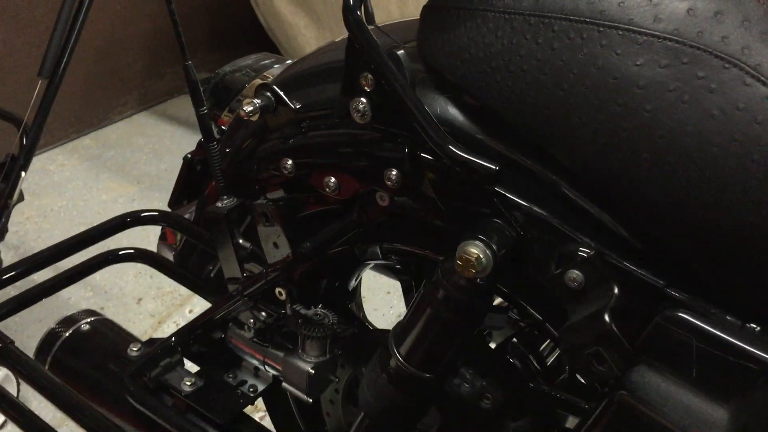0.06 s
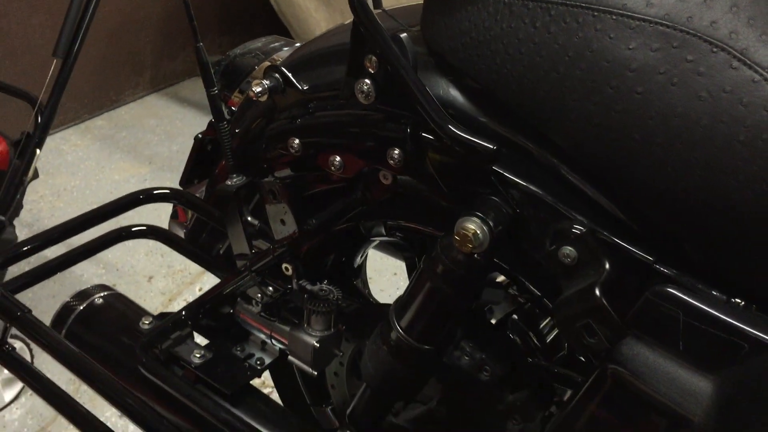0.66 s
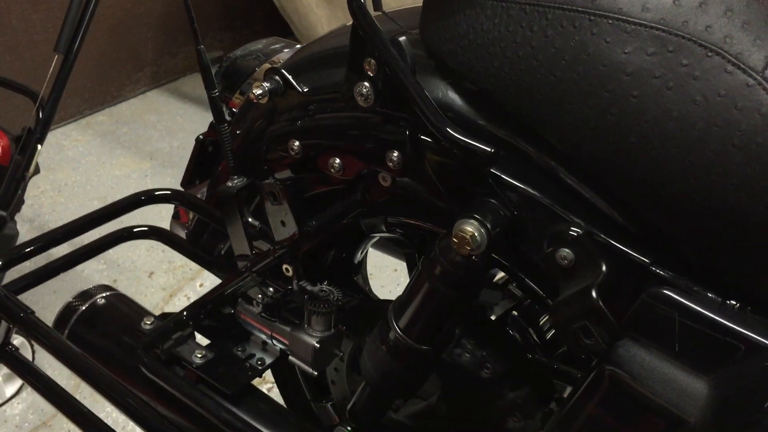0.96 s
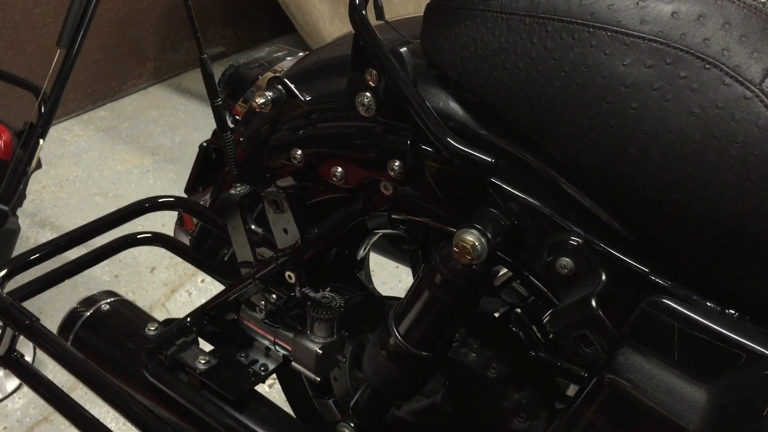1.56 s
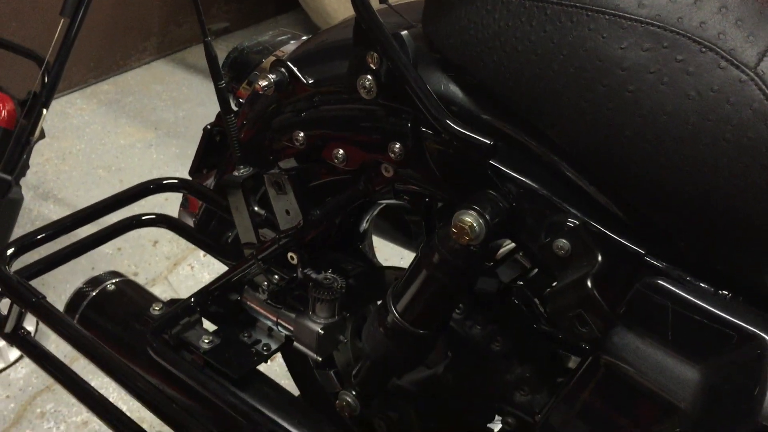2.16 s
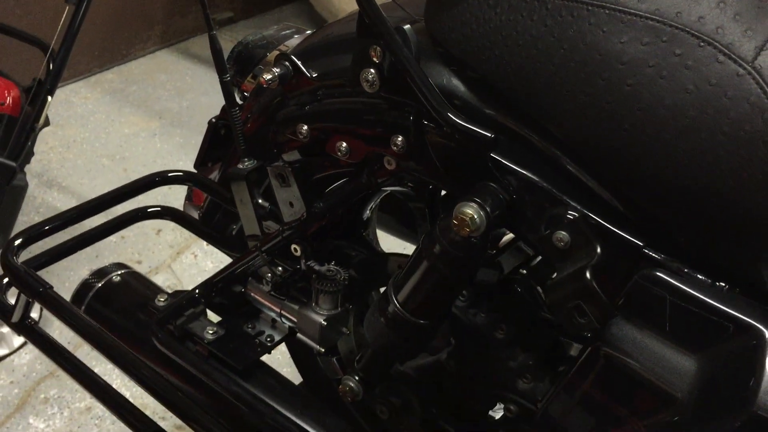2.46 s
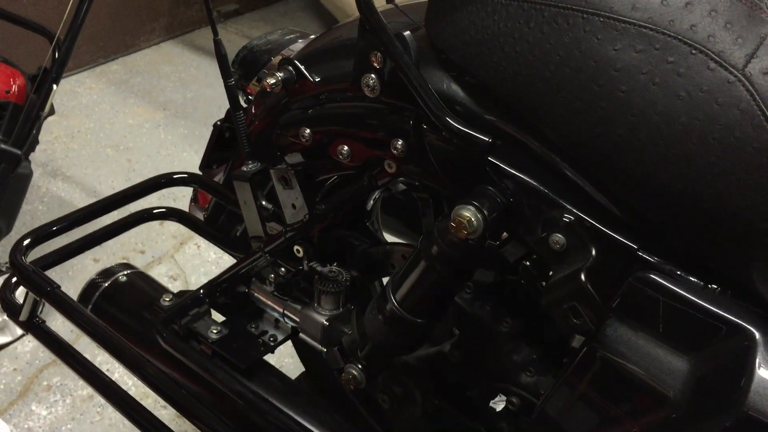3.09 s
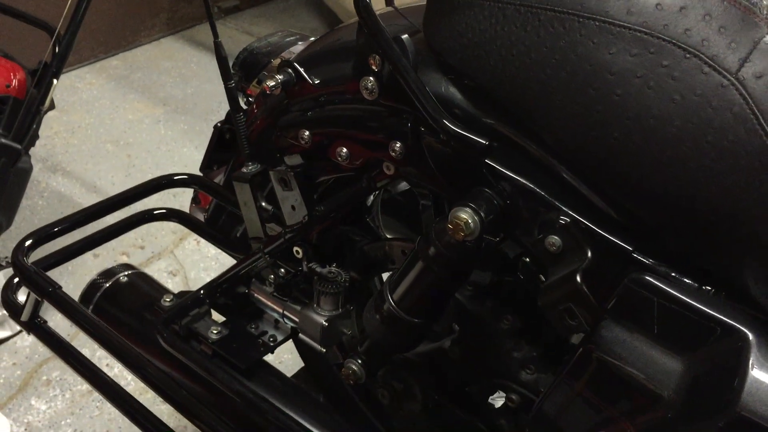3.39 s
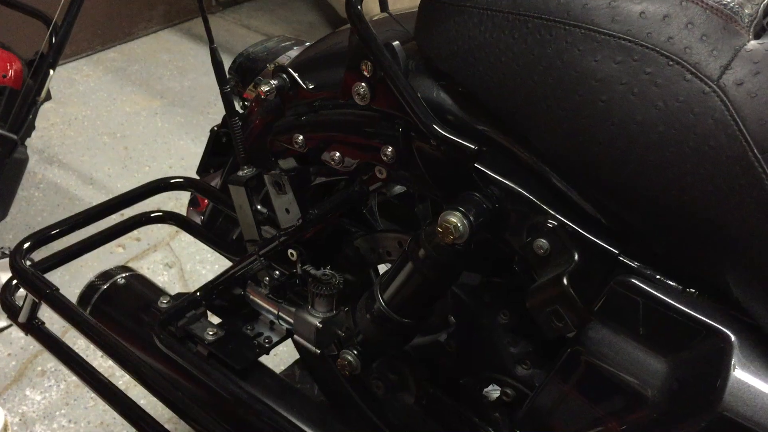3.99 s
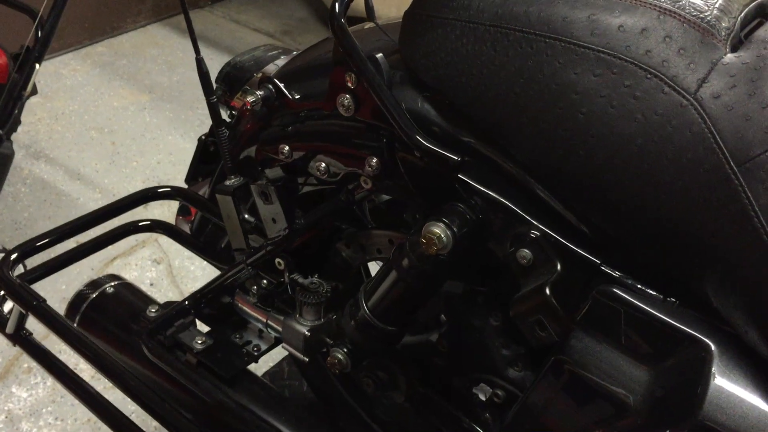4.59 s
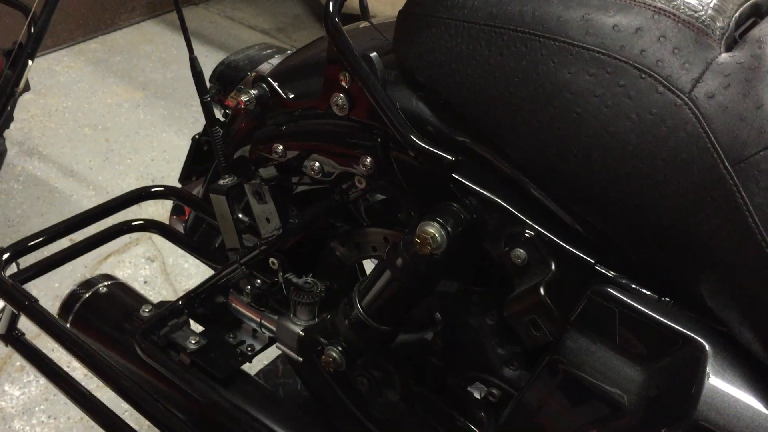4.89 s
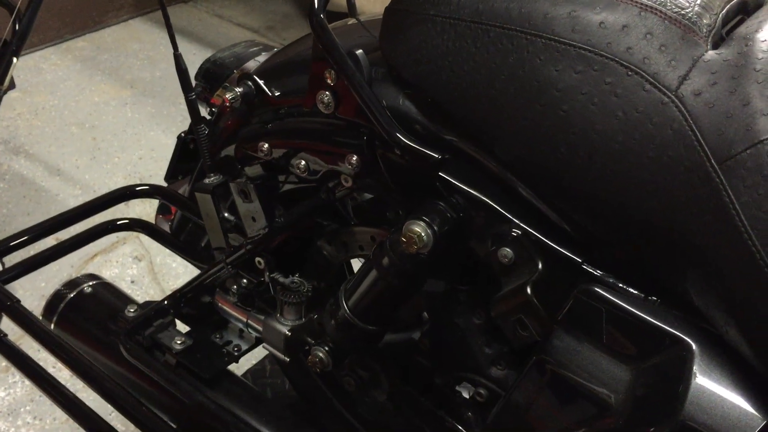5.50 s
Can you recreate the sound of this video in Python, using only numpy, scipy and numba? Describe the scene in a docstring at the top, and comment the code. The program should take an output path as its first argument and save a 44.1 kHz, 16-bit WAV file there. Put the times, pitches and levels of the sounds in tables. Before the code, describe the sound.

Air rushes from a motorcycle's suspension release valve in a loud, bright hiss, with a faint low rumble beneath it. The hiss slowly weakens and its high tone shifts as the pressure drops. After about five seconds the valve shuts with a soft knock and the hiss stops, followed by a faint scuff. It is heard close up in a small, quiet garage with a short reverberation.

```python
"""A bright hiss is heard first: air rushing from a motorcycle's suspension release valve in a small garage.
The turbulent jet excites resonances of the outlet and the hollows of the frame, and its colour shifts
as the bike sinks; eddies add a low rumble. After about five seconds the valve shuts with a soft knock,
the hiss dies away in the room's reverberation, and a faint scuff follows."""
import sys
import numpy as np
from scipy import signal
from scipy.fft import rfft, irfft
from scipy.io import wavfile
from scipy.ndimage import uniform_filter1d, map_coordinates
from numba import njit

SR = 44100
rng = np.random.default_rng(int(sys.argv[2]) if len(sys.argv) > 2 else 0)


def to_wav(s):
    """Save 16-bit WAV."""
    ch = np.atleast_2d(s).T  # columns
    pcm = np.round(np.clip(ch, -1, 1) * 32767)  # PCM
    wavfile.write(sys.argv[1], SR, pcm.astype(np.int16))


N = 249165

# Jet strength as the air spring empties. Each row: time in seconds, nominal level in dB.
JET_FLOW = [(0, -21), (.5, -22), (.75, -25.5), (1.5, -26), (2.3, -26.5), (4.2, -27), (4.75, -29),
            (5.1, -31.5)]
# Spectrum of the jet. Each row: frequency in Hz, relative spectral density in dB.
JET_COLOUR = [(350, -19.5), (700, -16.5), (1150, -11), (2000, -11), (2700, -7.5), (3700, -2), (4900, -13.5),
              (5300, -5.5), (7000, .5), (9000, -5.5), (10000, -6), (10500, -13), (11200, -8), (14500, -7.5),
              (15600, -6.5)]
# Resonances and cancellations of hose and frame. Each row: centre in Hz, width in Hz, gain in dB.
HOLLOW_RESONANCES = [(1177, 8.9, 7.5), (1260, 19, 6.5), (2120, 50, 4), (2287, 29, 8), (2570, 125, 8.5),
                     (2775, 46, 8.5), (2980, 106, 8.5), (3310, 30, -7), (3438, 43, 6.5), (3650, 170, 1.5),
                     (3946, 21, 8), (4270, 53, 7.5), (4470, 61, 10.5), (4766, 190, 9.5), (4920, 150, -2),
                     (5147, 90, 10), (5500, 58, 9.5), (5685, 110, 4.5), (6120, 110, 4.5), (6390, 29, 9),
                     (6660, 52, 8.5), (7040, 55, 7.5), (7460, 62, 5.5), (8160, 140, 1.5), (8630, 120, 7.5),
                     (9340, 154, 6.5), (11130, 97, 5)]
# Outlet resonances that swell and fade as the frame passes the jet. Each row: time of peak in seconds,
# spread in seconds, centre at the peak in Hz, glide in Hz per second, peak gain in dB (negative cancels).
OUTLET_FLARES = [(.8, 1, 5600, 1, 7.5), (4.3, .7, 5600, -1.5, 9), (1.25, 0.33, 6650, 0, 4),
                 (2.05, 0.36, 6410, 199, 8.5), (2.77, 0.2, 6530, 300, 9), (3.4, 0.18, 6640, 0, -2),
                 (4.9, .42, 6320, 100, 13), (0, 0.28, 7600, 0, -12), (1, 0.77, 7840, 1, 5.5),
                 (3.3, 0.54, 7550, -250, 4), (4.1, 0.4, 7100, 0, 0), (5.18, .08, 3020, 0, 3.5)]
# Spectrum of the eddies. Each row: frequency in Hz, relative spectral density in dB.
EDDY_SPECTRUM = [(20, -25.5), (35, -24), (50, -8.5), (70, -5), (110, -3.5), (190, -2.5), (300, -6),
                 (500, -12), (1000, -19.5)]
# Strength of the eddies. Each row: time in seconds, level in dB.
EDDY_LEVELS = [(.35, -51.5), (1.15, -47), (1.6, -50.5), (5.15, -57.5)]
# Spectrum of the quiet garage. Each row: frequency in Hz, relative spectral density in dB.
GARAGE_COLOUR = [(20, -24.5), (40, -9), (65, 2.5), (110, -12), (330, -11.5), (1000, -15), (2000, -18),
                 (4500, -31), (8000, -37), (15000, -47)]
# Modes of the valve body. Each row: frequency in Hz, relative level in dB, 60 dB decay time in seconds.
VALVE_BODY_MODES = [(280, -12, 0.052), (357, -9, 0.06), (460, -0.5, 0.052), (518, -7, 0.04),
                    (940, -11, 0.039), (1080, -9, 0.033), (1393, -5, 0.028), (3020, -12, .02)]
# Spectra of the bright and dull parts of a rub. Each row: frequency in Hz, relative density in dB.
BRIGHT_RUB_COLOUR = [(200, -21), (900, -8.5), (1300, -3.5), (2200, -7.5), (2800, -19), (4000, -19),
                     (4800, -31), (9000, -34.5), (15000, -45)]
DULL_RUB_COLOUR = [(100, -23), (450, -5), (750, -11), (880, 9.5), (1050, -16), (2000, -19.5), (6000, -36)]
# Resonances of the bright part. Each row: centre in Hz, width in Hz, gain in dB.
BRIGHT_RUB_RESONANCES = [(1130, 80, 14.5), (2370, 200, 9.5), (3220, 150, 14)]
# Rubs of the scuff. Each row: start of hold in seconds, hold in seconds, bright and dull levels in dB.
RUB_STROKES = [(5.391, 0.059, -54.5, -64), (5.51, .055, -76.5, -62), (5.615, .04, -75.5, -58)]

TIME = np.arange(N) / SR


def undb(db):
    """Amplitude grows tenfold for every 20 dB."""
    return 10 ** (np.asarray(db) / 20)


def unit(x):
    """Normalisation to an rms of 1."""
    return x / np.sqrt(np.mean(x ** 2))


def decay(elapsed_s, t60_s):
    """Exponential damping: the amplitude loses 60 dB every t60_s."""
    return np.exp(-np.log(1000) * elapsed_s / t60_s)


def curve(table):
    """Linear interpolation of (seconds, value) rows at every sample."""
    return np.interp(TIME, *np.transpose(table))


def fluctuation(rate_hz):
    """Smoothed random steps form a slow modulation of rms 1."""
    hold = int(SR / rate_hz)
    steps = np.repeat(rng.standard_normal(N // hold + 1), hold)
    return unit(uniform_filter1d(uniform_filter1d(steps, hold), hold)[:N])


def noise(colour, resonances=()):
    """Spectral shaping: white noise takes on a broad colour and narrow peaks or dips, at rms 1."""
    f = np.arange(N // 2 + 1) * SR / N + 1e-9
    hz, db = np.transpose(colour)
    gain_db = np.interp(np.log(f), np.log(hz), db)
    for centre, width, rise_db in resonances:
        gain_db += rise_db / (1 + (2 * (f - centre) / width) ** 2)
    return unit(irfft(rfft(rng.standard_normal(N)) * undb(gain_db), N))


def below(x, hz, order=2):
    """Low-pass filtering forwards and backwards cancels the phase shift."""
    return signal.sosfiltfilt(signal.butter(order, hz, fs=SR, output="sos"), x)


@njit
def resonator(x, hz, width_hz):
    """A damped oscillator with moving centre and bandwidth passes its centre frequency at gain 1."""
    out, band_state, low_state = np.empty(len(x)), 0., 0.
    for i in range(len(x)):
        tuning, damping = np.tan(np.pi * hz[i] / SR), width_hz[i] / hz[i]
        band = (band_state + tuning * (x[i] - low_state)) / (1 + tuning * (tuning + damping))
        band_state = 2 * band - band_state
        low_state += 2 * tuning * band
        out[i] = damping * band
    return out


def jet(flutter_db, surge_db):
    """Turbulence makes a broadband hiss, which flutters and surges as the jet flaps."""
    flow_db = curve(JET_FLOW)
    air = hollow_drift(noise(JET_COLOUR, HOLLOW_RESONANCES), pitch_share=.004)
    air = air - below(air, hz=170)  # so thin a jet radiates no bass
    roar = below(air, hz=1680, order=4)
    fizz = air - below(air, hz=8070, order=4)
    # Roar and fizz fade less than the body of the hiss: each regains a share of the lost decibels.
    lost_db = -24 - flow_db
    air = air + (undb(.63 * lost_db) - 1) * roar + (undb(.79 * lost_db) - 1) * fizz
    air = outlet_flares(air, base_width_hz=405)
    air = metal_reflections(air, share=.19, drift_s=.00006, edge_hz=7800, count=7)
    return air * undb(flow_db + flutter_db * fluctuation(110) + surge_db * fluctuation(16))


def hollow_drift(x, pitch_share):
    """A cavity's shape sets its pitch, so the resonances drift slightly as the bike sinks."""
    position = np.arange(N) + np.cumsum(pitch_share * fluctuation(2))
    return map_coordinates(x, [position], order=5, mode="mirror")


def outlet_flares(x, base_width_hz):
    """Resonances swell, glide and fade as the frame passes the jet; a stronger one is narrower."""
    for peak_s, spread_s, hz, glide, peak_db in OUTLET_FLARES:
        offset_s = TIME - peak_s
        gain_db = peak_db * np.exp(-.5 * (offset_s / spread_s) ** 2)
        ringing = resonator(x, hz + glide * offset_s, base_width_hz / undb(gain_db / 2))
        x = x + (undb(gain_db) - 1) * ringing
    return x


def metal_reflections(x, share, drift_s, edge_hz, count):
    """Small metal parts reflect only short waves; interference over changing paths swirls the treble."""
    low = below(x, edge_hz, order=3)
    treble, echoes = x - low, 0
    for lag_s in np.geomspace(.0007, .004, count):
        position = np.arange(N) - SR * (lag_s + drift_s * fluctuation(1.1))
        echoes += share * map_coordinates(treble, [position], order=3)
    return low + (treble + echoes) / np.sqrt(1 + count * share ** 2)


def eddies(gust_db):
    """Vortices around the bike make an uneven rumble that builds, then weakens with the pressure."""
    return noise(EDDY_SPECTRUM) * undb(curve(EDDY_LEVELS) + gust_db * fluctuation(18))


def garage_background(level_db, waver_db):
    """The room's ambient noise is faint and low, and wavers by random amplitude modulation."""
    return noise(GARAGE_COLOUR) * undb(level_db + waver_db * fluctuation(15))


def garage_echo(x, wet_db, low_t60_s, high_t60_s, split_hz, gap_s, count):
    """Reverberation: dense reflections from floor and walls decay, the treble soonest."""
    t = np.arange(SR // 2) / SR
    travel, echo = np.linspace(0, count - 1, N), 0
    for pattern in range(count):  # one reflection pattern fades into the next as things move
        scatter = rng.standard_normal(len(t)) * (t > gap_s)
        low = below(scatter, split_hz, order=6)
        tail = low * decay(t, low_t60_s) + (scatter - low) * decay(t, high_t60_s)
        tail /= np.sqrt(np.sum(tail ** 2))
        nearness = np.sqrt(np.maximum(1 - np.abs(travel - pattern), 0))
        echo += nearness * signal.fftconvolve(x, tail)[:N]
    return undb(wet_db) * echo


def valve_knock(start_s, gain_db, contact_s):
    """The plunger's impact on its soft seal sets the valve body into damped free vibration."""
    elapsed_s = np.maximum(TIME - start_s, 0)
    ringing = sum(undb(db) * np.sin(2 * np.pi * hz * elapsed_s) * decay(elapsed_s, t60_s)
                  for hz, db, t60_s in VALVE_BODY_MODES)
    ringing *= 1 - np.exp(-elapsed_s / contact_s)
    return undb(gain_db) * (ringing - below(ringing, hz=230))  # too small a body to radiate bass


def valve_opening(shut_s, t60_s):
    """Throttling: air passes freely until the valve seats, then the flow collapses exponentially."""
    return decay(np.maximum(TIME - shut_s, 0), t60_s)


def scuff(grain_db, attack_s, release_t60_s):
    """Sliding friction makes grainy noise: one short scrape, then duller rubs."""
    bright, dull = noise(BRIGHT_RUB_COLOUR, BRIGHT_RUB_RESONANCES), noise(DULL_RUB_COLOUR)
    rubs = 0
    for start_s, hold_s, bright_db, dull_db in RUB_STROKES:
        elapsed_s = TIME - start_s
        attack = np.clip(1 + elapsed_s / attack_s, 0, 1)
        release = decay(np.maximum(elapsed_s - hold_s, 0), release_t60_s)
        rubs += attack * release * (undb(bright_db) * bright + undb(dull_db) * dull)
    return rubs * undb(grain_db * fluctuation(180))


def scene():
    """Superposition: all sources add at one listening point, so both channels are alike."""
    air = jet(flutter_db=.57, surge_db=.35) + eddies(gust_db=.5)
    air *= valve_opening(shut_s=5.179, t60_s=.052)
    knock = valve_knock(start_s=5.177, gain_db=-25, contact_s=.001)
    rubs = scuff(grain_db=1, attack_s=.022, release_t60_s=.09)
    into_room = air + rubs + undb(-2) * knock  # the knock excites the room less than the jet does
    echo = garage_echo(into_room, wet_db=-11.5, low_t60_s=.29, high_t60_s=.19,
                       split_hz=3700, gap_s=.012, count=4)
    mono = air + knock + rubs + echo + garage_background(level_db=-62.5, waver_db=3)
    return np.array([mono, mono])


def record(dry):
    """Band limiting: an elliptic low-pass cuts the highest treble steeply."""
    top_hz = 15750
    return signal.sosfilt(signal.ellip(12, .1, 80, top_hz, fs=SR, output="sos"), dry)


dry = scene()
out = record(dry)
to_wav(out)
```